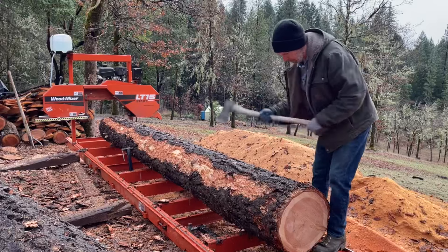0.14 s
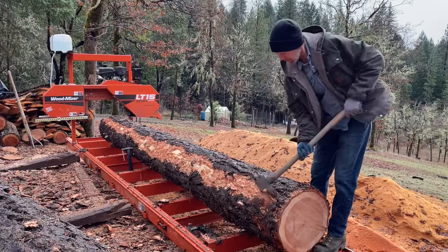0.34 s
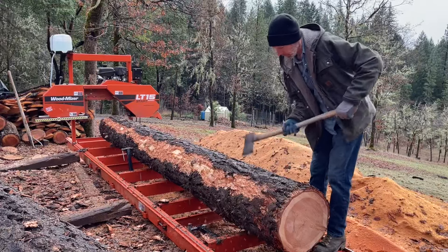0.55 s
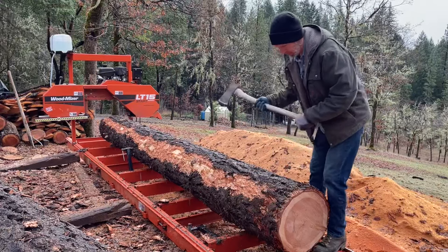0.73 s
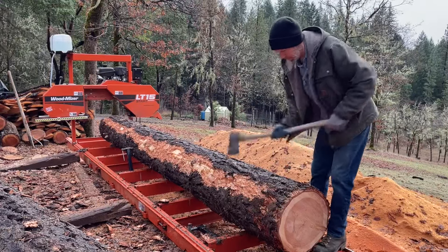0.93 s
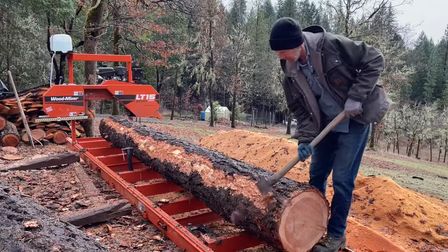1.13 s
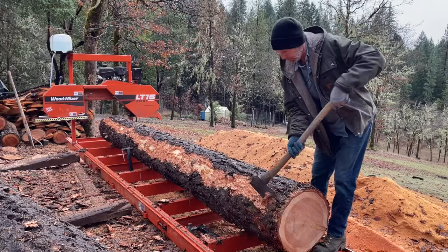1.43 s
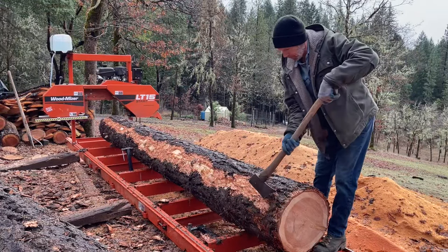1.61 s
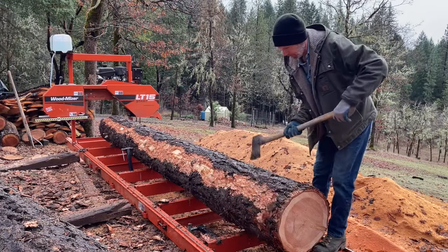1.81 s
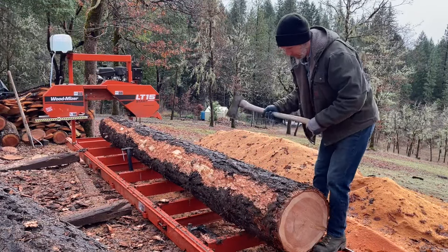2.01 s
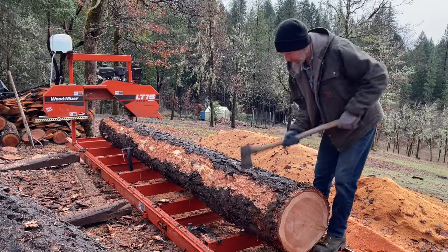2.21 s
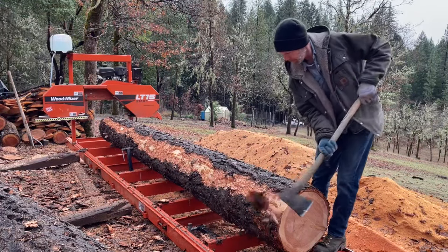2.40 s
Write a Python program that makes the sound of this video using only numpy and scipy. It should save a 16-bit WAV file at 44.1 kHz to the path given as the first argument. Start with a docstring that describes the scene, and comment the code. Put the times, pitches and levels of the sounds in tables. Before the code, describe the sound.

An axe chops into a log's bark close by at about 0.2, 1.0 and 2.2 seconds, each blow a sharp splintering clack with a brief low ring of wood. Around 1.3 to 1.5 seconds the bark crackles as the blade is levered out. Faint jacket rustles, soft boot thuds and tiny ticks of chips fall between swings, in still outdoor air with a slight echo from trees.

```python
"""Outdoors among trees, in still air, one microphone close to a felled log. An axe chops bark off it
three times: each chop is a quick run of fractures as the blade sinks in, a short clack and the low ring
of the log. Chips scatter and the trees answer faintly from farther off. After the second chop the blade
is levered out and the bark crackles. Boots and a jacket shift between the swings."""
import sys
import numpy as np
from scipy import signal
from scipy.fft import rfft, irfft, next_fast_len
from scipy.io import wavfile
from scipy.ndimage import uniform_filter1d

SR = 44100
rng = np.random.default_rng(int(sys.argv[2]) if len(sys.argv) > 2 else 0)


def materialize(psi):
    """Save the field psi as 16-bit PCM at rate SR to the path in sys.argv[1].

    A 1-D psi becomes a single channel; in a 2-D psi each row is a channel.
    """
    bounded = np.clip(np.atleast_2d(psi).T, -1, 1)
    quanta = np.round(bounded * 32767).astype(np.int16)
    wavfile.write(sys.argv[1], SR, quanta)


N = 112454


def amp(db):
    """Decibels to gain."""
    return 10 ** (np.asarray(db) / 20)


def unit(x):
    """Scale to rms 1."""
    return x / np.sqrt(np.mean(x ** 2) + 1e-20)


def along(points, hz):
    """Interpolate (Hz, value) points on a log frequency axis."""
    freqs, values = np.transpose(points)
    return np.interp(np.log(hz + 1), np.log(freqs + 1), values)


def coloured(x, spectrum, tilt_db=0, size=4096):
    """x through a causal filter of energy 1 with the given spectrum and tilt per octave."""
    hz = np.fft.rfftfreq(size, 1 / SR)
    cepstrum = irfft(np.log(amp(along(spectrum, hz) + tilt_db * np.log2(hz + 20))))
    cepstrum[1:size // 2] *= 2  # minimum phase keeps attacks sharp
    cepstrum[size // 2 + 1:] = 0
    response = irfft(np.exp(rfft(cepstrum)))
    return signal.fftconvolve(x, response / np.linalg.norm(response))[:len(x)]


def grit(count, spiky_db):
    """Noise of rms 1 that comes in tiny clumps of uneven strength."""
    clumps = np.repeat(np.clip(rng.standard_normal(count), -3, 2.5), 16)[:count]
    return unit(rng.standard_normal(count) * amp(spiky_db * clumps))


def ring(start, hz, db, t60, rise):
    """One damped mode, struck at the start time."""
    t = np.maximum(np.arange(N) / SR - start, 0)
    return amp(db - 60 * t / t60) * (1 - np.exp(-t / rise)) * np.sin(2 * np.pi * hz * t)


def buzz(start, hz, db, t60, q, size=8192):
    """A brief rough ring: dying noise through one resonance."""
    out = np.zeros(N + size)
    shape = amp(-60 * np.arange(size) / SR / t60)
    sound = signal.lfilter(*signal.iirpeak(hz, q, SR), shape * rng.standard_normal(size))
    out[round(start * SR):][:size] = amp(db) * sound * np.linalg.norm(shape) / np.linalg.norm(sound)
    return out[:N]


def cracks(rows, spectrum, rise, spiky_db, size=4096):
    """Short bursts of gritty noise, each evened out, coloured and given a set energy."""
    out, t = np.zeros(N + size), np.arange(size) / SR
    for start, db, t60, tilt_db in rows:
        shape = (1 - np.exp(-t / rise)) * amp(-60 * t / t60)
        bins = rfft(shape * grit(size, spiky_db))
        even = irfft(bins / (np.abs(bins) + 1e-12)) * np.sqrt(shape)
        burst = coloured(even, spectrum, tilt_db)
        out[round(start * SR):][:size] += amp(db) * burst * np.linalg.norm(shape) / np.linalg.norm(burst)
    return out[:N]


def swells(rows, spectrum, spiky_db):
    """Grainy noise that rises and falls by 20 dB in the given times."""
    out, t = np.zeros(N), np.arange(N) / SR
    for peak, db, rise, fall, tilt_db in rows:
        shape = amp(-20 * np.maximum((peak - t) / rise, (t - peak) / fall))
        sound = coloured(shape * grit(N, spiky_db), spectrum, tilt_db)
        out += amp(db) * sound * np.linalg.norm(shape) / np.linalg.norm(sound)
    return out


# The air all around. Each row: frequency in Hz, relative level in dB.
AIR_SPECTRUM = [(20, -11.5), (70, 1.5), (150, -6), (400, -10), (1000, -17), (3000, -26), (8000, -36.5),
                (15500, -44)]

def still_air(level_db=-61):
    """The outdoors lies under everything as a faint, steady, low noise."""
    return amp(level_db) * unit(coloured(rng.standard_normal(N), AIR_SPECTRUM))


def echo(x, decay, delay_s, reach_s):
    """A diffuse answer in which each frequency dies at its own speed, fading fast beyond its reach."""
    hz, t, bins = signal.stft(rng.standard_normal(SR // 2), SR, nperseg=256)
    fade = amp(-60 * t / along(decay, hz)[:, None]) / (1 + (t / reach_s) ** 10)
    tail = signal.istft(bins * fade, SR, nperseg=256)[1]
    delayed = np.pad(x, (round(delay_s * SR), 0))
    return signal.fftconvolve(delayed, tail / np.linalg.norm(tail))[:N]


# Echoes from near the log and from the trees. Each row: frequency in Hz, time to fall 60 dB (t60) in seconds.
NEARBY_DECAY = [(100, 0.11), (3000, 0.12), (15000, 0.073)]
TREE_DECAY = [(100, 1), (2500, 0.26), (15000, 0.079)]

def surroundings(sound):
    """Close reflections reach the microphone first; the trees answer later and more faintly."""
    nearby = amp(-20) * echo(sound, NEARBY_DECAY, delay_s=0.004, reach_s=0.1)
    trees = amp(-29.5) * echo(sound, TREE_DECAY, delay_s=0.049, reach_s=0.37)
    return nearby + trees


def litter(movement, per_second=81, median_hz=6000, base_db=-50, count=700, size=512):
    """Tiny soft ticks of dry litter, each with its own pitch, louder while the worker moves."""
    power = np.abs(uniform_filter1d(movement ** 2, size=2048))
    effort = np.sqrt(unit(np.sqrt(power)))
    out, t = np.zeros(N + size), np.arange(size) / SR
    times = np.cumsum(rng.exponential(1 / per_second, count))
    for start, (pitch, weight) in zip(times[times < N / SR], rng.standard_normal((count, 2))):
        at = int(start * SR)
        hz = min(median_hz * 2 ** (pitch / 2), SR / 4)
        age = t * hz / 1.5  # a tick peaks after 1.5 cycles
        tick = (age * np.exp(1 - age)) ** 2 * np.sin(2 * np.pi * hz * t)
        out[at:at + size] += amp(base_db) * np.tanh(weight) * effort[at] * tick
    return out[:N]


# Jacket rustles beside the log, and thuds of boots and of the log's bed. Each row: peak time in seconds,
# level in dB, rise and fall in seconds, treble tilt in dB per octave.
JACKET_RUSTLES = [(.12, -54, 0.82, 0.15, -2.5), (.69, -54, 0.2, .17, -0.5), (.89, -52.5, 0.092, 0.13, -3.5),
                  (1.66, -60.5, 0.18, 0.13, -0.5), (1.975, -55, 0.14, 0.17, -2.5),
                  (2.14, -60, 0.073, 0.066, -1)]
GROUND_THUDS = [(.125, -47, 0.087, 0.23, -4), (.238, -32, 0.061, 0.092, 6.5),
                (.29, -39.5, 0.022, 0.071, -9), (.668, -39, 0.041, 0.076, -2.5), (.9, -45, .1, 0.088, -1),
                (.995, -31, 0.036, 0.04, -4), (1.66, -49, 0.053, 0.025, 5.5),
                (1.925, -46.5, 0.074, 0.081, -2.5), (2.376, -38, 0.024, 0.033, 0.5)]
# The colours of cloth and ground. Each row: frequency in Hz, relative level in dB.
CLOTH_SPECTRUM = [(100, -12), (300, -4.5), (900, -5), (2500, -10.5), (7500, -15), (15000, -25)]
GROUND_SPECTRUM = [(20, -22.5), (55, -6.5), (130, -7), (200, -10.5), (400, -23), (4000, -94.5)]

def worker():
    """The jacket rubs, dry litter ticks along with it and the ground thuds dully."""
    rustle = swells(JACKET_RUSTLES, CLOTH_SPECTRUM, spiky_db=7.0)
    return rustle + litter(rustle) + swells(GROUND_THUDS, GROUND_SPECTRUM, spiky_db=0.5)


# Small snaps of bark and falling chips. Each row: start in seconds, level in dB, t60 in seconds,
# treble tilt in dB per octave.
BARK_SNAPS = [(.0917, -51, 0.031, -9.5), (.2745, -23.5, 0.0051, 10), (.3500, -35, 0.022, 9),
              (.6085, -41, 0.02, -6), (.7692, -43.5, 0.019, -3), (.8688, -38, 0.016, -7.5),
              (1.0452, -49, 0.0073, -0.5), (1.2475, -47, 0.075, 2.5), (1.3278, -33.5, 0.0099, 8),
              (1.3399, -14, 0.0061, 2), (1.3560, -20.5, 0.0089, 0), (1.3603, -27, 0.0046, -2.5),
              (1.3718, -27, 0.0092, 0), (1.3812, -25.5, 0.0098, 0), (1.3860, -30.5, 0.018, -2.5),
              (1.3912, -27, 0.007, -7), (1.3988, -20.5, 0.0071, -.5), (1.4058, -41, .008, 5),
              (1.4893, -39, 0.011, -0.5), (2.0200, -43, 0.016, -5), (2.4090, -49.5, 0.08, -6)]
# Tearing fibres and scattering crumbs. Each row: peak time in seconds, level in dB, rise and fall
# in seconds, treble tilt in dB per octave.
BARK_TEARS = [(.275, -54.5, 0.056, 0.13, 4), (.33, -51.5, 0.021, 0.034, 7.5),
              (1.06, -53.5, .09, 0.059, 2.5), (1.352, -42.5, 0.027, 0.067, 2.5),
              (1.392, -46, 0.07, 0.11, -6.5), (1.472, -49, 0.017, 0.062, -1),
              (2.39, -56.5, 0.054, 0.036, 5)]
# The colour of both. Each row: frequency in Hz, relative level in dB.
CHIP_SPECTRUM = [(60, -25), (200, -10.5), (1350, -6), (2000, -2), (3300, -3), (4100, -7), (4800, -4),
                 (8300, -9.5), (8800, -15), (15500, -22.5)]

def loose_bark(slab_hz=3430, slab_q=9, blade_hz=997, blade_q=13):
    """Bark crackles through the resonances of loose slab and blade; the blade knocks as it is levered."""
    snaps = cracks(BARK_SNAPS, CHIP_SPECTRUM, rise=0.00053, spiky_db=-1)
    crunch = snaps + swells(BARK_TEARS, CHIP_SPECTRUM, spiky_db=8.5)
    slab = amp(3.5) * signal.lfilter(*signal.iirpeak(slab_hz, slab_q, SR), crunch)
    blade = amp(2.5) * signal.lfilter(*signal.iirpeak(blade_hz, blade_q, SR), crunch)
    knock = buzz(start=1.2475, hz=blade_hz, db=-44.5, t60=0.18, q=blade_q)
    return crunch + slab + blade + knock


# Splinters in the cut and underfoot. Each row: start in seconds, pitch in Hz, level in dB, t60 in seconds.
SPLINTER_BREAKS = [(.5595, 8410, -52, 0.009), (0.9386, 6040, -45, 0.012), (1.966, 4100, -47.5, 0.027),
                   (2.2490, 2016, -22, 0.035), (2.2526, 3180, -22, 0.037), (2.2615, 6320, -22.5, 0.021)]

def splinters():
    """Each splinter buzzes briefly around its own pitch as it lets go."""
    return sum(buzz(start, hz, db, t60, q=3.2) for start, hz, db, t60 in SPLINTER_BREAKS)


# Knocks on the log. Each row: start in seconds, level in dB, t60 in seconds, treble tilt in dB per octave.
LOG_KNOCKS = [(.0917, -33.5, 0.02, 5), (.215, -25, 0.21, -2), (.409, -37.5, 0.024, -2.5),
              (.968, -29, 0.24, -1.5), (1.249, -47.5, 0.12, 0.5), (2.24, -26, 0.26, -3.5)]
# The colour of the wood. Each row: frequency in Hz, relative level in dB.
WOOD_SPECTRUM = [(100, -6), (220, -2), (450, 0), (750, -6.5), (1300, -16), (4000, -52.5)]

def wooden_knocks():
    """The wood knocks dully under the chops and the handling between them."""
    return cracks(LOG_KNOCKS, WOOD_SPECTRUM, rise=0.00033, spiky_db=-2, size=8192)


# Fractures in the cut, close to the microphone. Each row: start in seconds, level in dB, t60 in seconds,
# treble tilt in dB per octave.
BARK_FRACTURES = [(.2092, -14.5, 0.074, -1.5), (.2116, -13.5, 0.013, 4), (.2144, -9, .016, -1.5),
                  (.2195, -21.5, 0.041, 8), (.9570, -23.5, 0.048, -1.5), (.9643, -13.5, 0.042, -1),
                  (.9686, -16, 0.022, 4.5), (2.2360, -15, 0.014, -2.5), (2.2425, -26, 0.055, -0.5),
                  (2.2484, -17, 0.025, 2), (2.2535, -25.5, 0.072, 4.5), (2.2565, -20.5, 0.015, -1.5),
                  (2.2620, -31, 0.021, 4.5)]
# The colour of breaking bark. Each row: frequency in Hz, relative level in dB.
BARK_SPECTRUM = [(100, -21.5), (300, -4), (800, -1), (1200, -5), (1900, 3), (2600, -5), (3300, -4.5),
                 (4200, -9), (7500, -14), (10000, -22.5), (15500, -31)]

def fractures():
    """Fibres break in a quick run as the blade sinks in."""
    return cracks(BARK_FRACTURES, BARK_SPECTRUM, rise=0.0001, spiky_db=4.0)


# The three blows. Each row: start in seconds, the log ring's rise in seconds and its t60 factor,
# the clack's rise in seconds and its t60 factor.
BLOWS = [(.2143, 0.008, 1.08, 0.00023, 0.57), (.9645, 0.0021, 1.08, 0.00051, 0.75),
         (2.2365, 0.025, 0.9, 0.0012, 1.28)]
# Modes of the log and of the axe in the cut. Each row: frequency in Hz, base t60 in seconds, then
# levels in dB for blows 1, 2 and 3, since each spot excites them differently.
LOG_MODES = [(68.5, 0.52, -36.5, -31, -33), (165.6, 0.58, -21.5, -32, -25), (184, 0.08, -12.5, -37.5, -6),
             (270.2, 0.21, -24, -20, -23.5), (388, 0.18, -35, -25, -41), (698, .068, -31, -13, -5.5)]
CLACK_MODES = [(360, 0.064, -23.5, -17.5, -20.5), (750, 0.042, -6.5, -17, -17.5),
               (1090, 0.027, -15, -27, -31), (1523, 0.026, -27, -6.5, -17.5),
               (1860, 0.023, -3.5, -15.5, -40.5), (2004, 0.029, -24, -7, -20.5),
               (2280, 0.013, -28, -24.5, -14.5), (3350, 0.027, -12, -29, -34.5),
               (4600, 0.033, -17.5, -19.5, -33)]

def axe_blows():
    """The blade meets solid wood with a short clack, and the trunk rings in a few low modes."""
    out = np.zeros(N)
    for blow, (start, log_rise, log_length, clack_rise, clack_length) in enumerate(BLOWS):
        bodies = (LOG_MODES, log_rise, log_length), (CLACK_MODES, clack_rise, clack_length)
        for modes, rise, length in bodies:
            for m, (hz, t60, *levels) in enumerate(modes):
                sense = (-1) ** m  # neighbouring modes swing in opposite sense
                out += sense * ring(start, hz, levels[blow], t60 * length, rise)
    return out


def scene():
    """At the microphone, in mono: air, the echoes of breaking bark, the worker and the chopping."""
    breaking = fractures() + splinters() + loose_bark()
    background = surroundings(breaking) + still_air()
    chopping = breaking + wooden_knocks() + axe_blows()
    return (background + worker() + chopping)[None]


def record(dry, top_hz=16100):
    """The recorder clips at full scale and keeps nothing above its band limit."""
    size = next_fast_len(N + SR // 2)
    passband = 1 / (1 + (np.fft.rfftfreq(size, 1 / SR) / top_hz) ** 90)
    clipped = np.clip(dry, -1, 1)
    return irfft(rfft(clipped, size) * passband, size)[..., :N]


dry = scene()
out = record(dry)
materialize(out)
```